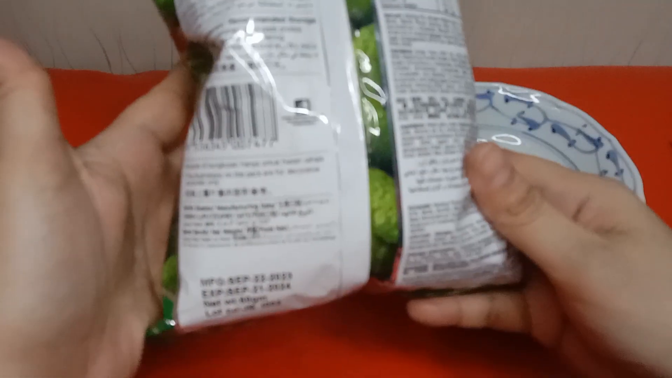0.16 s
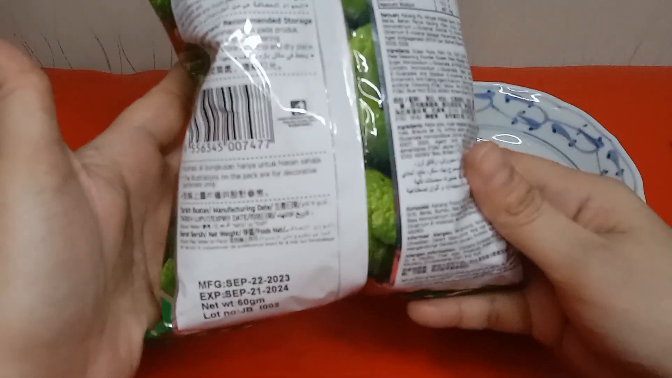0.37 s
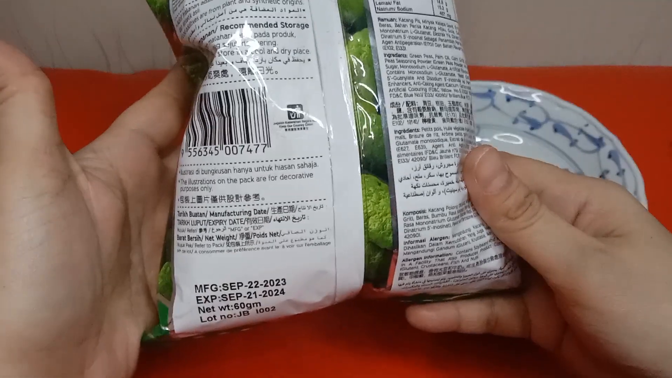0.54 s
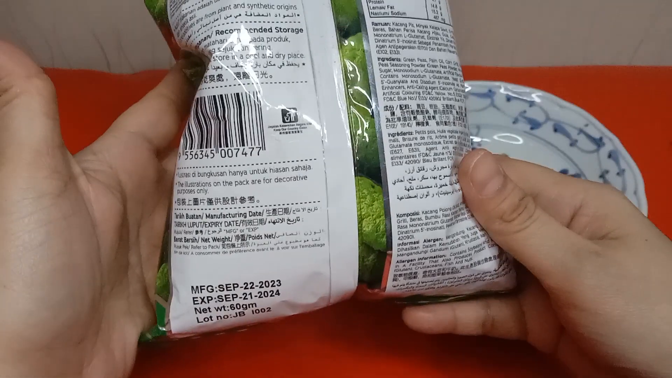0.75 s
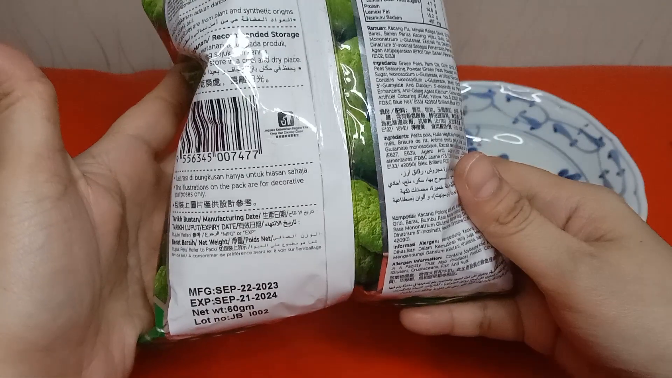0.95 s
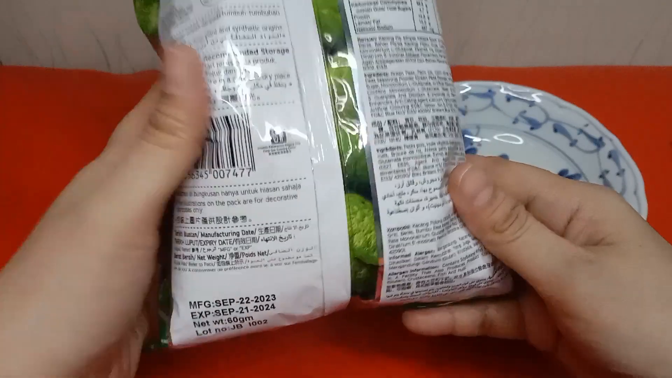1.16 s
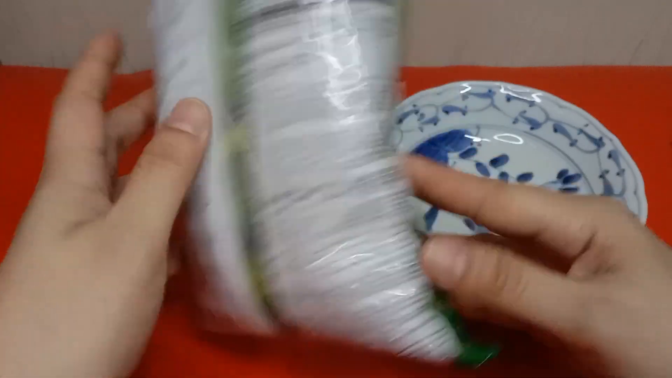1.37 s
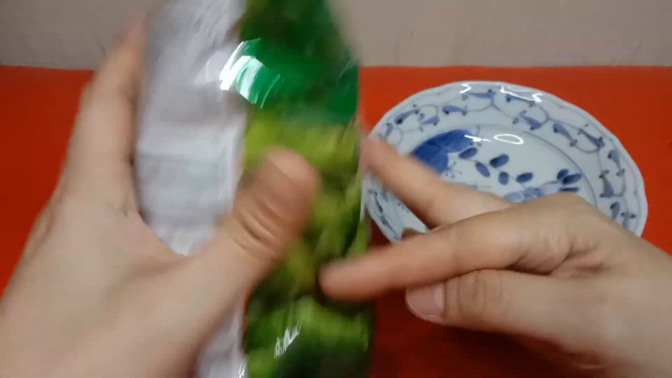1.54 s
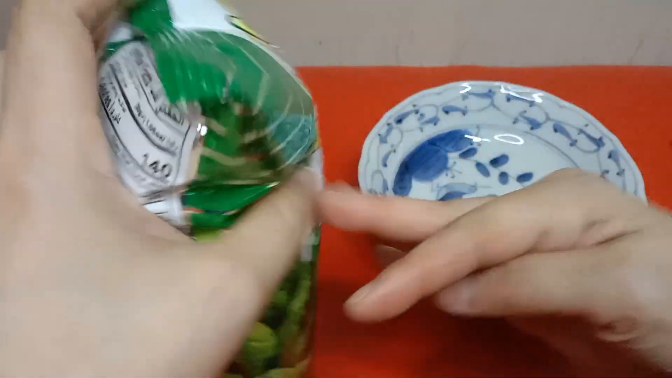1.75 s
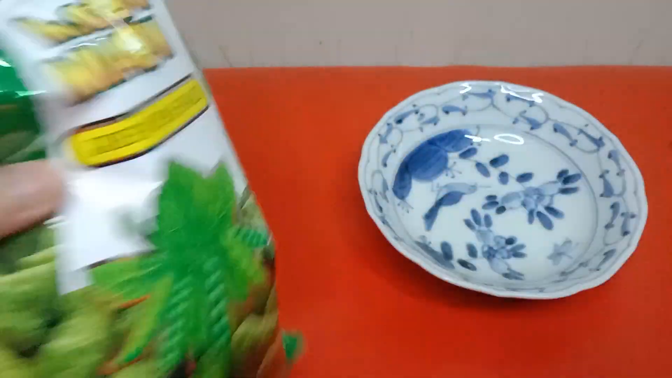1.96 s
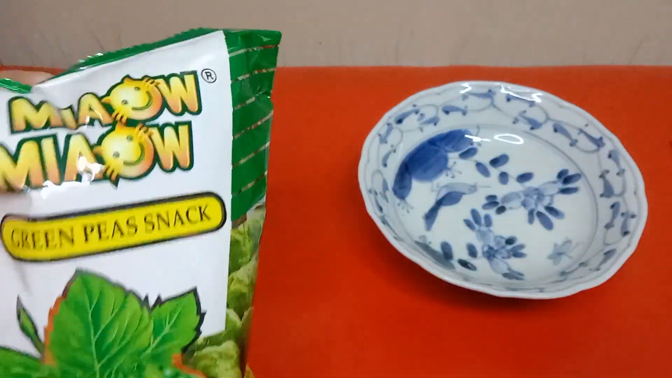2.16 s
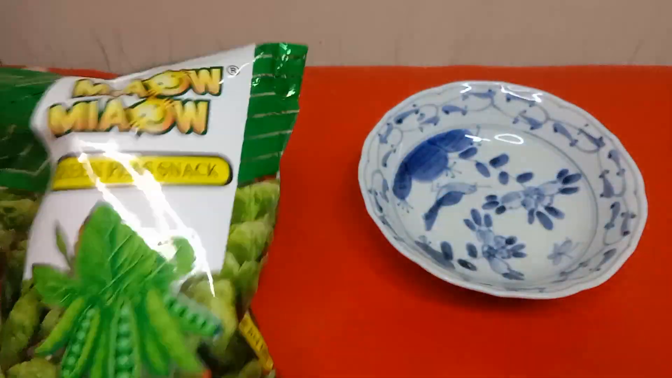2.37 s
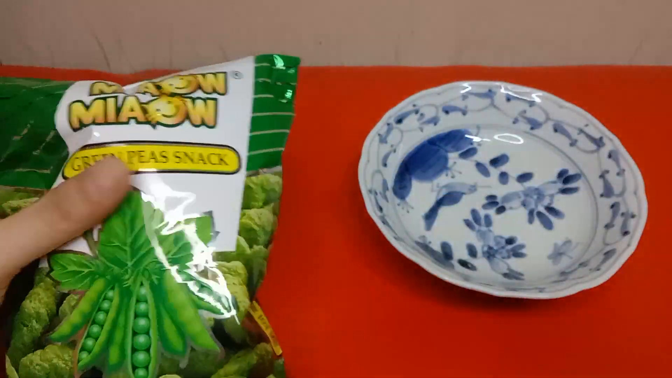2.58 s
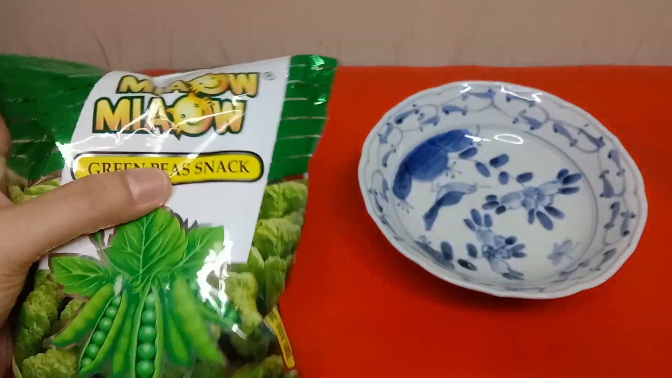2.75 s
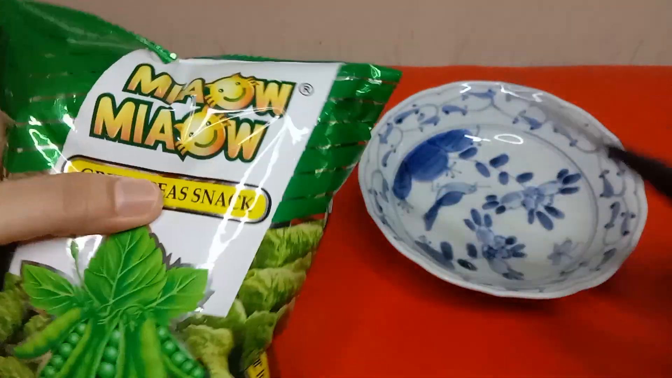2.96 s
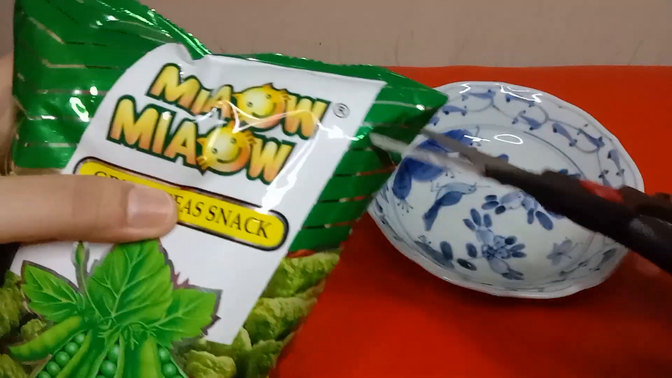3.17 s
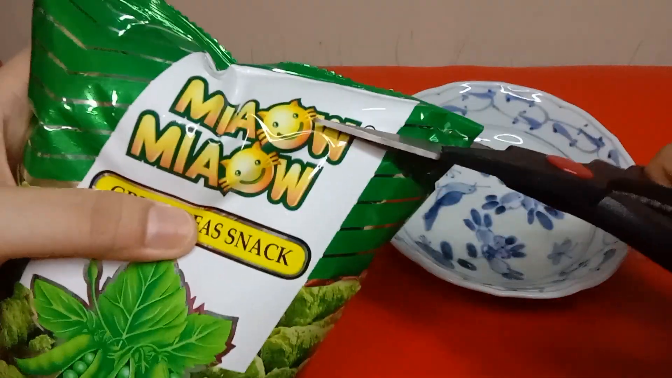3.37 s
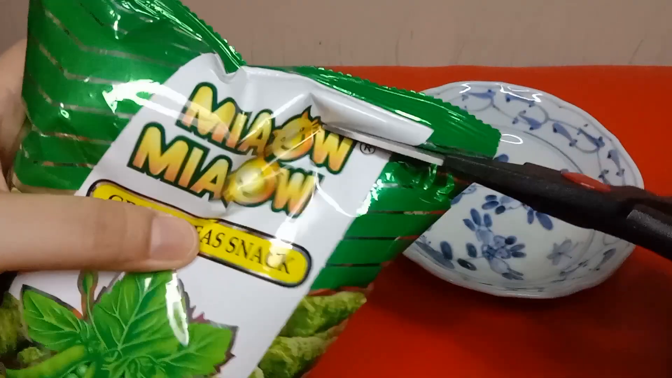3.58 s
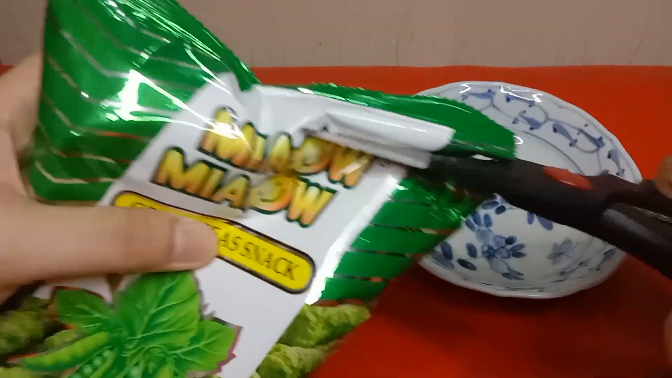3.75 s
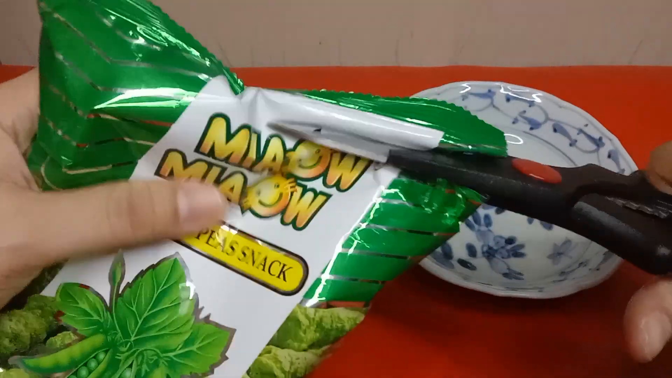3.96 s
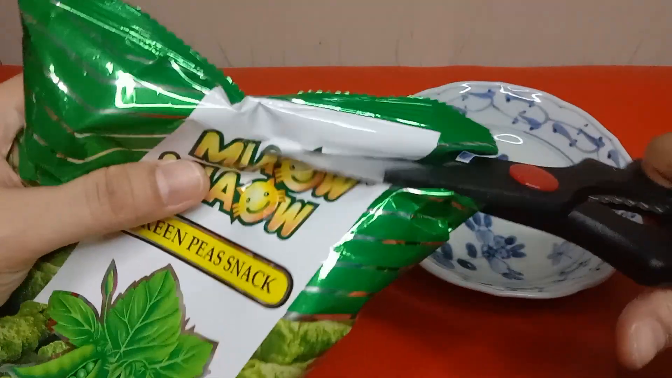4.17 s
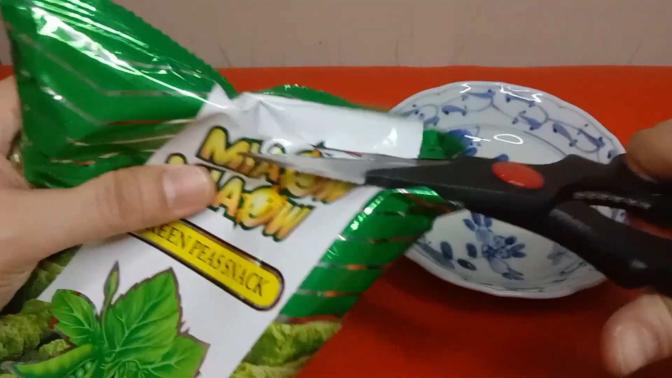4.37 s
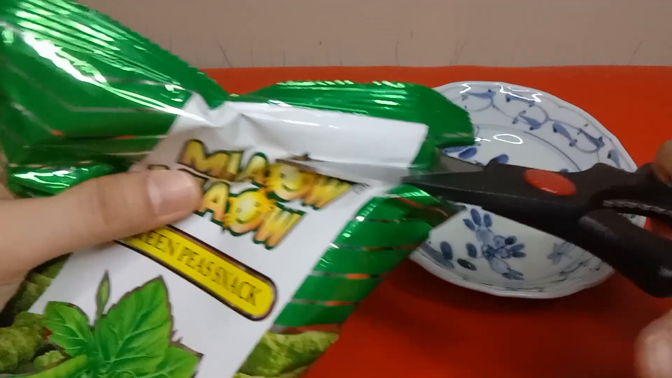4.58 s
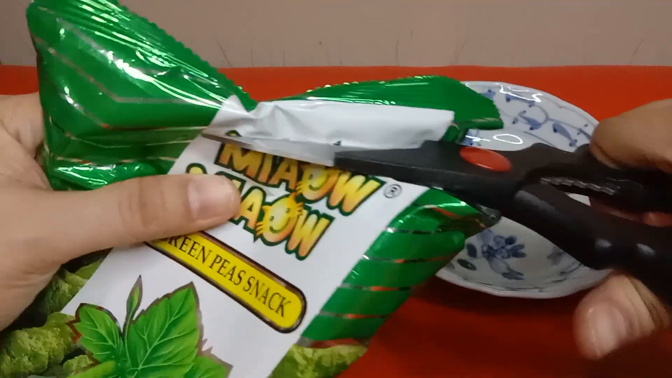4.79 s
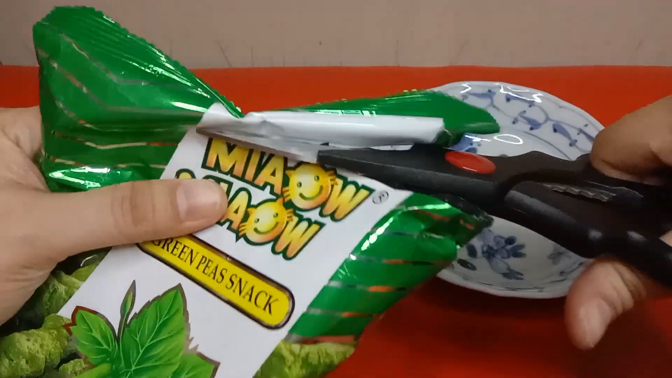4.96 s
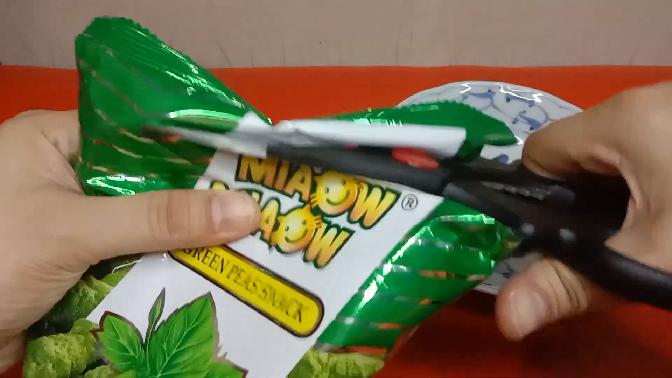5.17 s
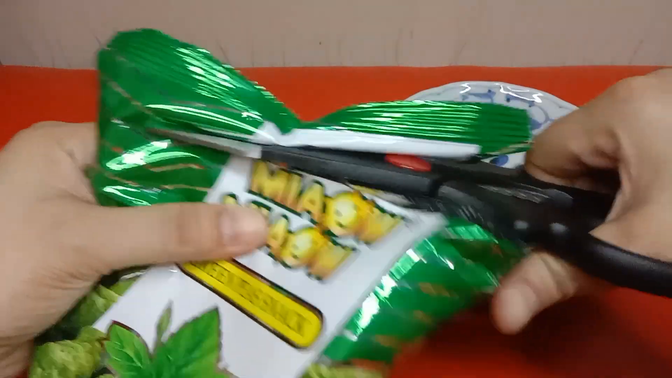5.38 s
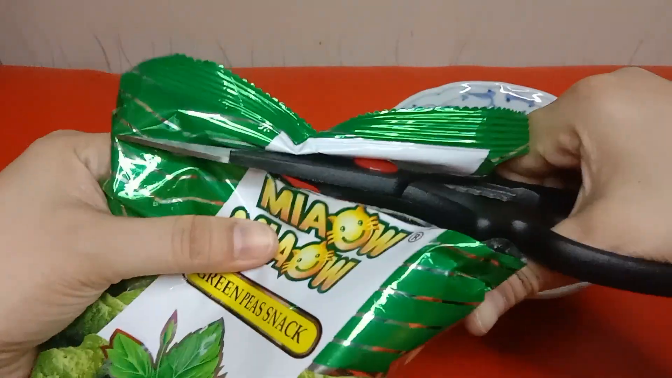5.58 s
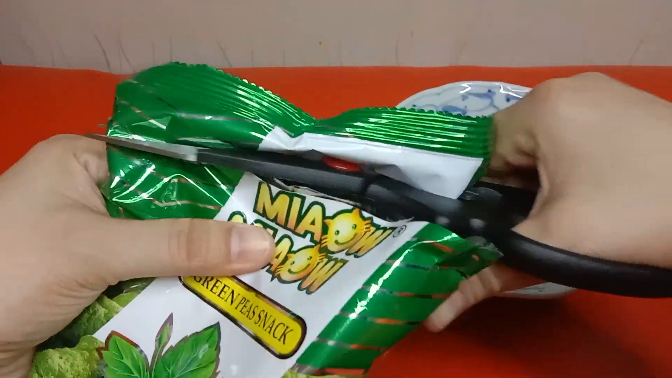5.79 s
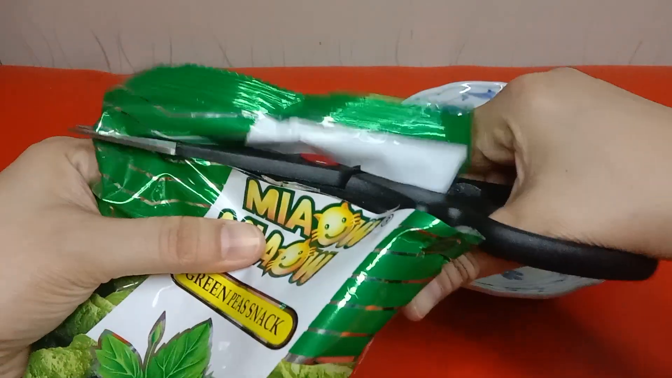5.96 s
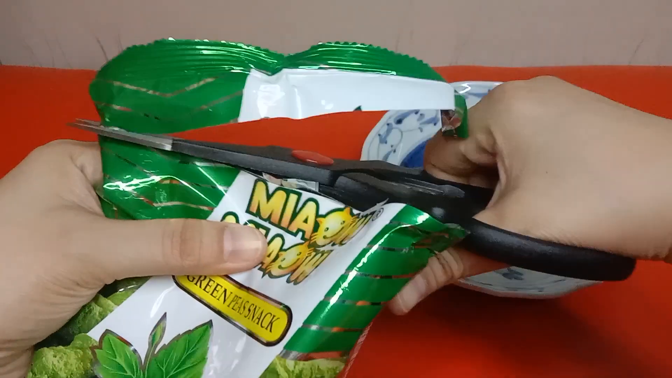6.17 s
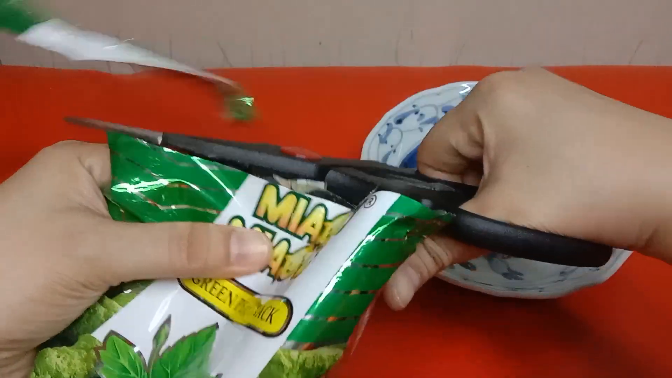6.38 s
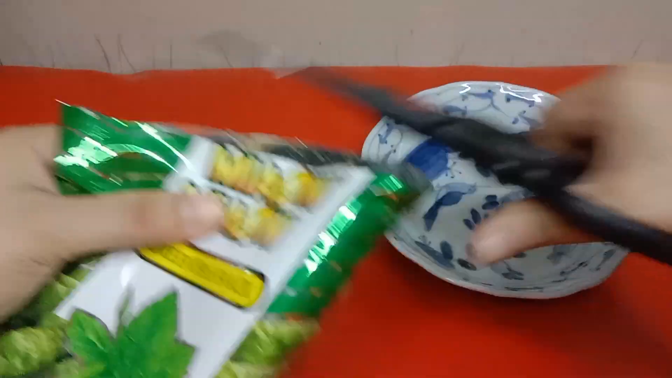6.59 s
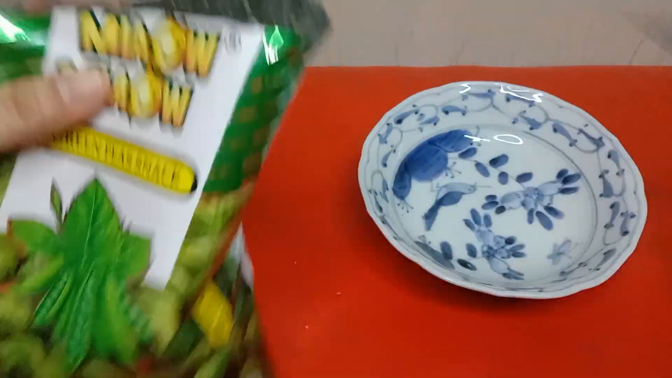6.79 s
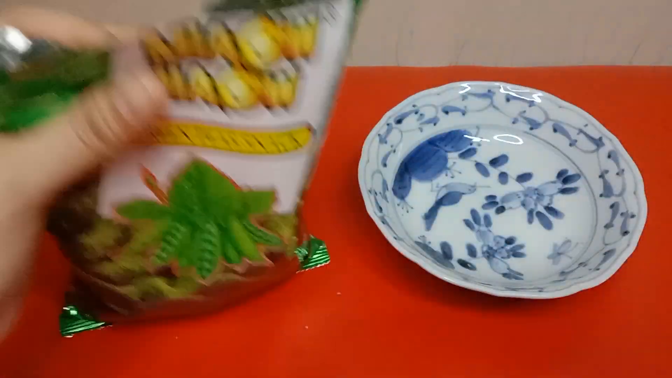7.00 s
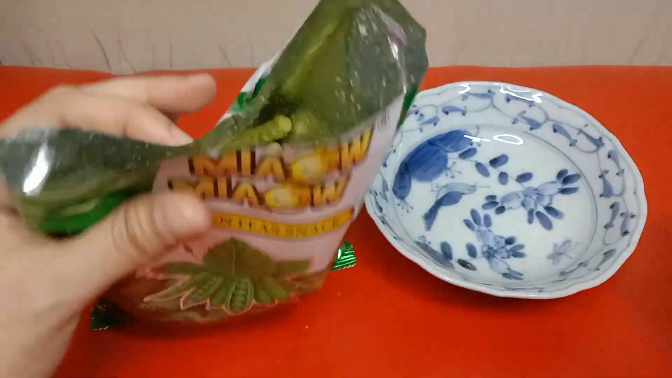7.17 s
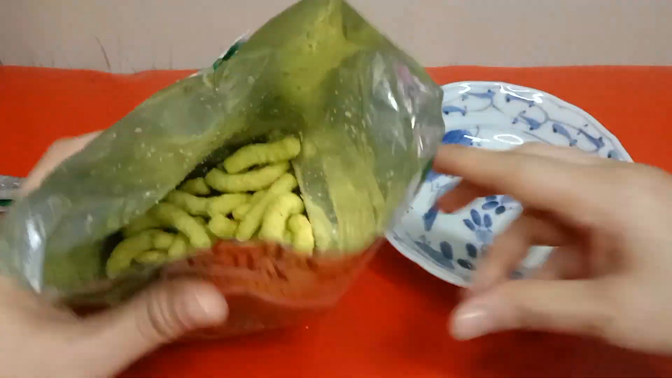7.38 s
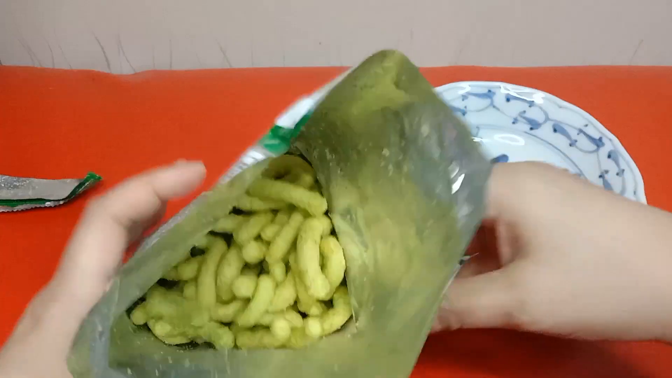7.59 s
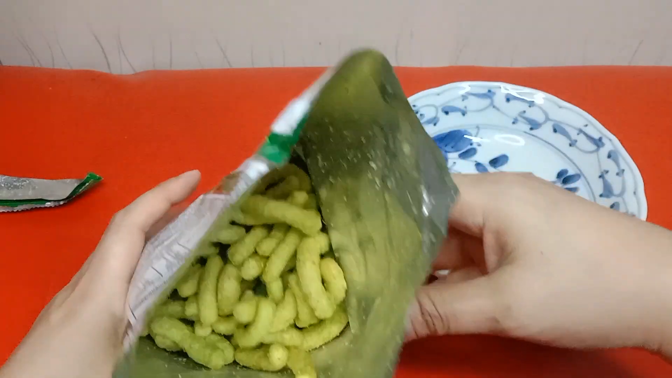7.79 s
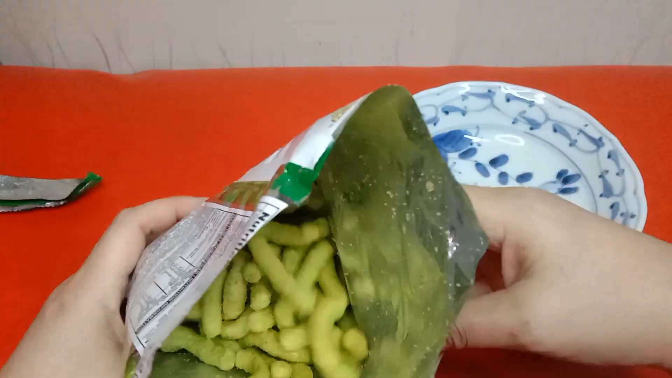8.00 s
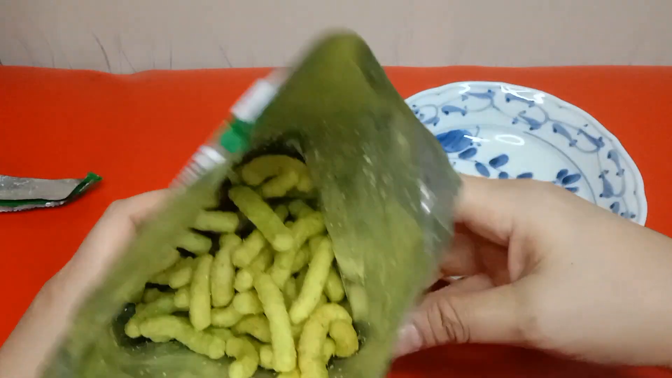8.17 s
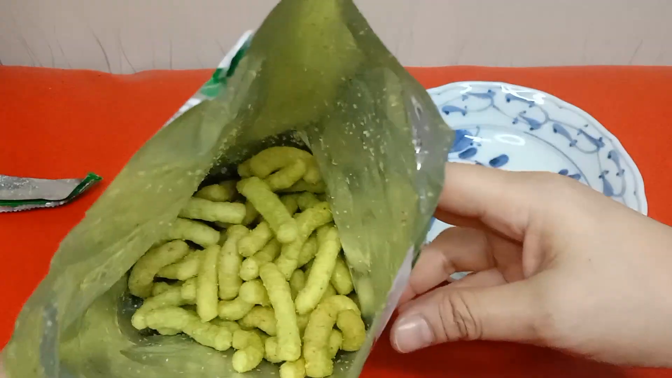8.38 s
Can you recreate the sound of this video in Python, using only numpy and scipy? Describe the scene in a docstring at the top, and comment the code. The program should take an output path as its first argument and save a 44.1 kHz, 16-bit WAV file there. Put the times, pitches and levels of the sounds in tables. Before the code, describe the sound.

After a near-quiet moment with a faint electrical hum, a foil bag crackles and light snacks knock around inside it. The crackling grows thick and snappy as scissors work through the top, then thins to a few softer crinkles as the bag is spread open. It is all very close to a phone microphone in a small room, with irregular low rumbles and thumps of air hitting the microphone.

```python
"""In a small room, a foil snack bag is turned, squeezed and cut open close to a phone microphone.
Creases buckle one by one, releasing elastic energy as snaps over a fine crackle. The snacks knock
together and excite the air in the bag, and the last cuts set the scissor blades in free vibration.
Turbulent air buffets the microphone port, a transformer hums faintly and the room reverberates.
The phone turns the bag down in strong puffs and gates faint treble."""
import sys
import numpy as np
from scipy import signal
from scipy.fft import rfft, irfft, next_fast_len
from scipy.io import wavfile
from scipy.ndimage import uniform_filter1d, map_coordinates

SR = 44100
rng = np.random.default_rng(int(sys.argv[2]) if len(sys.argv) > 2 else 0)


def unload_audio(sound):
    """Save the sound as a 16-bit wav file, at the path given as the first command line argument."""
    columns = np.transpose(np.atleast_2d(sound))
    # keep every value between -1 and 1, then stretch to whole-number steps
    steps = np.round(np.clip(columns, -1, 1) * 32767)
    wavfile.write(sys.argv[1], SR, steps.astype(np.int16))


N = 372204

# Harmonics of the transformer: harmonic number, rms level/dB
HUM_HARMONICS = [(1, -68.5), (2, -81), (3, -82), (7, -89.5), (9, -92.5), (11, -88.5), (13, -71.5),
                 (31, -96.5), (43, -100)]
# Spectrum of the quiet room air: f/Hz, relative level/dB
ROOM_AIR_SPECTRUM = [(30, -10), (100, 7.5), (400, -25), (1100, -17), (2200, -26.5), (5500, -28),
                     (12000, -46)]
# Puffs of air pushed at the port: start t/s, duration/s, level/dB
PUFFS = [(0.296, 0.031, -50.5), (0.609, 0.0038, -30.5), (1.046, 0.028, -50), (1.869, 0.14, -45.5),
         (2.032, 0.19, -31), (2.335, 0.0062, -22), (2.477, 0.07, -23), (2.596, 0.059, -30.5),
         (2.694, 0.058, -23.5), (2.769, 0.32, -29), (3.142, 0.04, -41.5), (3.233, 0.034, -29),
         (3.417, 0.054, -26.5), (3.557, 0.21, -25), (3.779, 0.046, -25), (3.862, 0.19, -29),
         (4.113, 0.1, -28.5), (4.343, 0.18, -38.5), (4.489, .1, -28), (4.78, 0.026, -36.5),
         (4.974, 0.037, -29.5), (5.05, 0.045, -46.5), (5.169, 0.14, -32.5), (5.579, 0.066, -36.5),
         (5.656, 0.3, -20.5), (5.863, 0.18, -37), (6.693, 0.026, -28), (6.74, 0.18, -30.5),
         (6.98, 0.13, -30), (7.436, 0.0091, -38), (7.483, 0.07, -30), (7.612, 0.16, -54.5),
         (8.076, 0.054, -42.5), (8.187, 0.014, -33.5)]
# Spectrum of turbulence at the port: f/Hz, relative level/dB
EDDY_SPECTRUM = [(25, -37), (62, 2), (118, 4.5), (184, -5), (257, -10.5), (299, -12), (430, -30),
                 (760, -53), (1540, -120)]
# Single puffs that thump the port: t/s, relative level/dB
THUMPS = [(0.604, -31.5), (2.468, -22), (2.78, -14), (2.864, -20.5), (3.446, -16.5), (3.533, -19.5),
          (3.777, -14.5), (3.947, -16), (5.667, -13.5), (5.715, -10.5), (5.893, -17), (6.766, -12.5),
          (7.033, -19), (7.057, -22.5), (7.481, -22.5)]
# Creases that buckle: t/s, relative snap level/dB, body level re snap/dB, panel f/Hz
SNAPS = [(0.6498, -51, 10, 2870), (0.7057, -50.5, 9, 2500), (1.2514, -33.5, -4, 1200.0),
         (1.2944, -16.5, -7.5, 1190), (1.352, -25, 3.5, 1170), (1.3937, -19, -1.5, 814),
         (1.406, -12, -10.5, 1050), (1.4368, -8.5, -6, 1200), (1.4792, -4.5, -19, 800),
         (1.5426, -22.5, 5.5, 1140), (1.6072, -6.5, -6, 1860), (1.6191, -2.5, -5, 1430.0),
         (1.6956, -12, -4.5, 886), (1.7452, -13.5, -4.5, 1220), (1.7726, -5, -26, 1330),
         (1.8031, -7, -10, 1340.0), (2.067, -22, -9, 837), (2.174, -34, 15, 1230),
         (2.2723, -20.5, -11.5, 1010), (2.479, -26, -5, 1220), (2.5998, -12.5, -4, 1160.0),
         (2.6305, -16.5, -9.5, 740), (2.7282, -1.5, -4.5, 1190), (2.7551, -12.5, -10.5, 1170.0),
         (2.809, -0.5, -16.5, 800.0), (2.9305, -34.5, 11, 1180), (3.006, -3, -7, 1370),
         (3.019, -17.5, -14.5, 1330), (3.178, -47.5, 13.5, 1400), (3.2474, -15, 6.5, 1380),
         (3.3549, -12.5, -19, 1600.0), (3.373, -18.5, -6, 780.0), (3.3836, -32, 11.5, 970),
         (3.4244, -8, -17, 1660), (3.474, -17.5, -9, 700), (3.5266, -3.5, -19.5, 516),
         (3.537, -19, 0.5, 846), (3.553, -4, -8.5, 1600), (3.5805, -4.5, -10.5, 1320),
         (3.617, -2, -5.5, 860), (3.648, -5.5, -4.5, 1410), (3.7342, -2, -19, 880.0),
         (3.8245, -5, -5, 1550), (3.8721, -7, -6, 1970), (3.9233, -16, -40, 1430),
         (3.9907, -3.5, -16.5, 1850.0), (4.0065, -6.5, -8.5, 1350), (4.0346, -2, -13, 1530),
         (4.0767, -11, -8.5, 2160), (4.1501, -10.5, -7.5, 1630), (4.218, -15, -20, 510),
         (4.2771, -16.5, -27, 1920), (4.341, -24, -2.5, 610), (4.366, -19.5, -3.5, 870),
         (4.4335, -8, -8, 1610), (4.4393, -12, -6.5, 1400), (4.459, -10.5, -14.5, 1220),
         (4.6846, -19.5, -11, 940), (4.7339, -16.5, -13, 760), (4.8996, -7.5, -22.5, 2500.0),
         (4.9156, -1.5, -19.5, 1680.0), (4.927, -3, -18.5, 1270), (4.945, -12, -8, 2120),
         (4.9622, -4.5, -7.5, 1540), (4.9899, -9, -3.5, 1740), (5.0129, -9, -7.5, 1620),
         (5.0247, -12.5, -29, 1370), (5.1131, -10, -8, 1180), (5.1447, -11, -16.5, 1200),
         (5.1706, -10, -14, 1100), (5.21, -8.5, -17, 1620), (5.288, -11.5, -11.5, 1850),
         (5.3163, -16, -10, 880.0), (5.467, -22, 2.5, 1480), (5.4777, -14, -26.5, 1460.0),
         (5.4889, -22, 3.5, 1290), (5.548, -17, -41, 2500.0), (5.563, -1.5, -38, 970),
         (5.6508, -6, -8, 2670), (5.7377, -2.5, -15.5, 930), (5.8102, -15, -7.5, 1030),
         (5.876, -10, -7.5, 1620), (5.9835, -14.5, -9, 1130), (5.9989, -10, -19, 960.0),
         (6.0369, -10.5, -34, 880), (6.048, -11.5, -11.5, 2720), (6.0498, -27.5, 8.5, 960),
         (6.1084, -17.5, -14.5, 2700), (6.3152, -22, -36, 2100), (6.3434, -13.5, -18, 2050.0),
         (6.4005, -32.5, 1.5, 1600), (6.4129, -13, -24, 1260), (6.5168, -29, 2.5, 1850),
         (6.5972, -12, -33, 1670), (6.614, -42.5, 14.5, 1510), (6.7499, -12, -12, 1320.0),
         (6.899, -25, -22, 1700), (6.94, -27, -2, 2640), (7.0035, -15, -13, 1650), (7.034, -17.5, -8, 490),
         (7.0574, -9, -13.5, 685), (7.1091, -21.5, -10.5, 1550), (7.196, -29, -5, 1000),
         (7.2845, -26.5, -27, 1580), (7.3359, -29.5, -9, 1380), (7.6908, -13.5, -8.5, 1430),
         (7.703, -23, -3, 1130), (7.826, -33, -13, 1200.0), (7.8975, -34.5, -1.5, 1190),
         (7.976, -28, -2, 964), (7.997, -19, -11, 1240), (8.0197, -12, -7.5, 1470),
         (8.0715, -18.5, -7.5, 1900), (8.4157, -23, -9, 2190.0)]
# Spectrum of the film heard through the microphone: f/Hz, relative level/dB
FILM_SPECTRUM = [(240, -40.5), (400, -5), (715, -7.5), (847, -4), (1130, -8), (1610, 1), (2060, -5),
                 (3300, -1), (4220, -7), (5650, 2.5), (8670, -8), (11400, -16), (15500, -17)]
# Spells of the hands working the bag: start t/s, duration/s, film level/dB, snack level/dB
GRIPS = [(0.654, 0.064, -80, -58.5), (1.238, 0.28, -44.5, -43), (1.391, 0.44, -41.5, -33),
         (1.853, 0.069, -44, -42.5), (2.089, 0.2, -50.5, -45.5), (2.438, 0.34, -56.5, -49),
         (2.711, 0.2, -44.5, -34.5), (3.152, 0.079, -55.5, -50), (3.364, 0.15, -48.5, -44.5),
         (3.582, 0.4, -39, -37), (4.149, 0.061, -34.5, -38.5), (4.305, 0.19, -41.5, -40),
         (4.566, 0.02, -47, -42), (4.669, 0.14, -37, -38.5), (4.88, 0.092, -46.5, -42),
         (5.103, 0.21, -37, -41), (5.431, 0.12, -38.5, -45.5), (5.8, 0.037, -36, -38),
         (5.988, 0.027, -34.5, -41), (6.114, 0.094, -46.5, -55.5), (6.328, 0.058, -40.5, -50),
         (6.521, 0.013, -43.5, -56), (6.898, .3, -52, -50), (7.341, 0.14, -58.5, -55.5),
         (7.497, 0.3, -62.5, -69), (7.673, 0.02, -59.5, -46), (7.949, 0.021, -44.5, -39),
         (7.983, 0.16, -47, -47)]
# Spectrum of snacks shifting in the air-filled bag: f/Hz, relative level/dB
SNACK_SPECTRUM = [(110, -31), (180, -4.5), (237, -5), (697, 1), (1260, 5), (2500, 1), (3250, -27)]
# Resonances of air pockets among the snacks: f/Hz, bandwidth/Hz, gain/dB
AIR_POCKETS = [(840, 49, 4.5), (1028, 72, -2), (1313, 80, 1)]
# Heaps of snacks landing as the sealed bag is turned: t/s, level/dB
TUMBLES = [(1.413, -24), (1.495, -31), (1.532, -25.5), (1.614, -26.5), (1.695, -21.5), (1.753, -27)]
# Modes of the scissor blades: f/Hz, level re snap/dB, t60/s
BLADE_MODES = [(1074, -40.5, 0.43), (3000, -40.5, .3)]
# Reverberation time of the room: f/Hz, t60/s
ROOM_DECAY = [(300, 0.13), (3000, 0.28), (15000, 0.21)]


def amp(db):
    """Amplitude ratio of a level in decibels."""
    return 10 ** (np.asarray(db) / 20)


def unit(x):
    """Normalisation to unit rms."""
    return x / np.sqrt(np.mean(x ** 2) + 1e-20)


def along(points, hz):
    """Interpolation of (f/Hz, value) points on a logarithmic frequency axis."""
    f, value = np.transpose(points)
    return np.interp(np.log(hz + 1), np.log(f + 1), value)


def wobble(rate):
    """Smooth random modulation: a spline through `rate` Gaussian knots a second."""
    return map_coordinates(rng.standard_normal(int(N * rate / SR) + 4), [np.arange(N) * rate / SR])


def coloured(x, points, lo_hz=0, hi_hz=30000, size=4096):
    """Minimum-phase filtering with unit energy: the given spectrum between two soft band edges."""
    hz = np.fft.rfftfreq(size, 1 / SR) + 1
    gain = amp(along(points, hz)) / np.sqrt((1 + (lo_hz / hz) ** 8) * (1 + (hz / hi_hz) ** 8))
    cepstrum = irfft(np.log(gain + 1e-6))
    cepstrum[1:size // 2] *= 2
    cepstrum[size // 2 + 1:] = 0
    kernel = irfft(np.exp(rfft(cepstrum)))
    return signal.oaconvolve(x, kernel / np.linalg.norm(kernel))[:N]


def bursts(times, gains, shapes, lead=0.0018):
    """Superposition of transients, one row of shapes each, starting `lead` seconds early."""
    at = np.round((times - lead) * SR).astype(int).clip(0)[:, None] + np.arange(shapes.shape[1])
    return np.bincount(at.ravel(), (gains[:, None] * shapes).ravel(), N + shapes.shape[1])[:N]


def spells(start, length, level_db, rise_db_s, fall_db_s):
    """Envelope of incoherent sources: each spell rises, holds and falls, and their powers add."""
    t = np.arange(0, N, 100) / SR
    early = np.maximum(start[:, None] - t, 0)
    late = np.maximum(t - (start + length)[:, None], 0)
    power = np.sum(amp(level_db[:, None] - rise_db_s * early - fall_db_s * late) ** 2, axis=0)
    return np.interp(np.arange(N) / SR, t, np.sqrt(power))


def pings(hz, cycles):
    """Damped oscillators: each swells quickly, then decays by 1/e every `cycles` periods."""
    turns = hz[:, None] * np.arange(int(.03 * SR)) / SR
    return np.sin(2 * np.pi * turns) * np.exp(-turns / cycles) * (1 - np.exp(-turns / 0.15))


def transformer(overtone_gain, hum_hz=119.7):
    """Periodic vibration gives a harmonic series; each partial drifts slightly in level."""
    phase = 2 * np.pi * hum_hz * np.arange(N) / SR
    partials = [amp(db + wobble(1.6)) * np.sqrt(2) * np.sin(k * phase + 2 * np.pi * rng.random())
                for k, db in HUM_HARMONICS]
    return partials[0] + overtone_gain * sum(partials[1:])


def room_air():
    """Stationary broadband noise forms the ambient floor."""
    return amp(-67) * unit(coloured(rng.standard_normal(N), ROOM_AIR_SPECTRUM))


def buffet():
    """Turbulent pressure fluctuations at the port, of fairly even strength within each puff."""
    eddies = coloured(amp(4 * wobble(40)) * rng.standard_normal(N), EDDY_SPECTRUM, size=16384)
    strength = np.sqrt(np.abs(uniform_filter1d(eddies ** 2, size=1500)) + 1e-9)
    push = spells(*np.transpose(PUFFS), rise_db_s=857, fall_db_s=638.5)
    return push * unit(eddies / strength ** 0.35)


def thumps():
    """Heavily damped impulse response: a quick push on the diaphragm and its rebound."""
    times, level_db = np.transpose(THUMPS)
    rebound = pings(hz=np.full(len(times), 170), cycles=0.57)
    return bursts(times, -amp(level_db + 10.5), rebound, lead=.002)


def rattle(count, t60, rise, spike, lead=0.0029):
    """Broadband transient, a short crack: noise swells for a millisecond or two, spikes and dies away."""
    t = np.arange(int(.03 * SR)) / SR - lead
    decay_speed = amp(3 * rng.standard_normal((count, 1)))
    envelope = np.where(t < 0, np.exp(t / rise), amp(-60 * t * decay_speed / t60))
    noise = rng.standard_normal((count, len(t))) * envelope
    noise[:, np.argmax(t >= 0)] += spike * np.sign(noise[:, 0])
    return noise


def snaps(bright_from_db=-28.5):
    """Buckling: each crease cracks the stiff film and excites small facets and a panel of the bag."""
    times, snap_db, body_db, panel_hz = np.transpose(SNAPS)
    scatter = rng.standard_normal((len(times), 4))
    # faint creases are too slow to excite the highest frequencies
    bright_share = 1 / (1 + amp(2 * (bright_from_db - snap_db) + 9 * scatter[:, 0]))
    crack = rattle(len(times), t60=0.0087, rise=0.0012, spike=3.8)
    bright = bursts(times, bright_share * amp(snap_db - 8.5), crack)
    dull = bursts(times, (1 - bright_share) * amp(snap_db - 3.0), crack)
    film = coloured(bright, FILM_SPECTRUM, lo_hz=2870)
    film += coloured(dull, FILM_SPECTRUM, lo_hz=2600, hi_hz=6200)
    body_rattle = rattle(len(times), t60=0.025, rise=0.00086, spike=0.76)
    body = coloured(bursts(times, amp(snap_db + body_db - 5.5), body_rattle), FILM_SPECTRUM, hi_hz=2700)
    panel = bursts(times, amp(snap_db + body_db), pings(panel_hz, cycles=4.08), lead=0.0004)
    first_hz, second_hz, third_hz = 5000 * amp(3.25 * scatter[:, 1:].T).clip(.5, 2)
    long_rings = pings(second_hz, cycles=34) + pings(third_hz, cycles=32)
    facet_rings = pings(first_hz, cycles=11) + amp(-14) * long_rings
    facets = bursts(times, amp(snap_db - 14), facet_rings, lead=0)
    return film + facets + body + panel


def patchy(x, depth_db):
    """Shifting radiation: as different parts of the bag sound, bands swell and fade for tens of ms."""
    spectrum = signal.stft(x, nperseg=256)[2]
    field = uniform_filter1d(rng.standard_normal(spectrum.shape), size=2, axis=0)
    field = uniform_filter1d(field, size=20, axis=1)
    return signal.istft(spectrum * amp(depth_db * unit(field)), nperseg=256)[1][:N]


def grains(count, spread_db, t60, slide):
    """Shot noise: random ticks, most of them faint, over the friction hiss of sliding surfaces."""
    draw = rng.random((count, 2))
    times = draw[:, 0] * N / SR
    clumping_db = 1.5 * wobble(30)[(times * SR).astype(int)]
    size_db = -spread_db * np.log(draw[:, 1] + 0.0032) + clumping_db
    ticks = bursts(times, amp(size_db), rattle(count, t60, rise=0.0021, spike=2.4))
    return patchy(unit(ticks) + slide * rng.standard_normal(N), depth_db=4.0)


def agitation(grip_db, settle_db, settle_fall_db_s):
    """Excitation envelope: the hands' work and the settling after each snap add in power."""
    start, length, _, _ = np.transpose(GRIPS)
    snap_times = np.transpose(SNAPS)[0]
    handling = spells(start, length, grip_db, rise_db_s=403.5, fall_db_s=279)
    settling = spells(snap_times, 0, settle_db, rise_db_s=4000, fall_db_s=settle_fall_db_s)
    return np.hypot(handling, settling)


def film_crackle():
    """Small-scale buckling: tiny folds tick under the hands and after each snap."""
    _, _, grip_db, _ = np.transpose(GRIPS)
    _, snap_db, body_db, _ = np.transpose(SNAPS)
    envelope = agitation(grip_db, settle_db=snap_db + body_db.clip(0) - 26.5, settle_fall_db_s=261.5)
    ticks = grains(count=3000, spread_db=4, t60=.01, slide=.33)
    return envelope * unit(coloured(ticks, FILM_SPECTRUM, lo_hz=2200))


def air_pockets(x):
    """Cavity resonance: the pockets of air ring briefly on top of the knocks."""
    size = next_fast_len(N + SR // 2)
    f = np.fft.rfftfreq(size, 1 / SR)
    rings = sum(amp(db) * 1j * f * width / (hz * hz - f * f + 1j * f * width)
                for hz, width, db in AIR_POCKETS)
    return irfft(rfft(x, size) * (1 + rings), size)[:N]


def snack_knocks(slit_s=4.6, slit_loss_db=8.5, crossover_hz=670):
    """Dull collisions of puffed snacks in enclosed air; their low body weakens once the bag is slit."""
    _, _, _, grip_db = np.transpose(GRIPS)
    _, snap_db, body_db, _ = np.transpose(SNAPS)
    envelope = agitation(grip_db, settle_db=snap_db + body_db - 20.5, settle_fall_db_s=259)
    knocks = grains(count=2000, spread_db=2.6, t60=.018, slide=.3)
    seal = amp(-slit_loss_db * (np.arange(N) / SR > slit_s))
    upper = coloured(knocks, SNACK_SPECTRUM, lo_hz=crossover_hz, hi_hz=2300)
    lower = 0.64 * seal * coloured(knocks, SNACK_SPECTRUM, hi_hz=crossover_hz)
    return envelope * unit(air_pockets(upper + lower))


def tumbles(cushion_hz=259):
    """Impact on an air spring: each landing heap booms in the air cushion of the bag."""
    times, level_db = np.transpose(TUMBLES)
    boom_hz = cushion_hz * amp(rng.standard_normal(len(times)))
    return bursts(times, amp(level_db), pings(boom_hz, cycles=2.96), lead=0.0016)


def scissors(from_s=5.3, until_s=6.2):
    """Free vibration: snaps during the last cuts strike the modes of the steel blades."""
    times, snap_db = np.transpose([row[:2] for row in SNAPS if from_s < row[0] < until_s])
    blows = np.bincount((times * SR).astype(int), amp(snap_db + 2.2 * rng.standard_normal(len(times))), N)
    t = np.arange(SR // 2) / SR
    ring = sum(amp(db - 60 * t / t60) * np.sin(2 * np.pi * hz * t) for hz, db, t60 in BLADE_MODES)
    return signal.fftconvolve(blows, ring)[:N]


def reverberation(x, slices=20, delay_samples=150):
    """Diffuse decay; the bag moves, so every slice of time has its own pattern of echoes."""
    out, step = np.zeros(N + 2 * SR), N // slices + 1
    for k in range(slices):
        hz, t, noise = signal.stft(rng.standard_normal(SR // 4), SR, nperseg=256)
        decay = amp(-60 * t / along(ROOM_DECAY, hz)[:, None])
        tail = signal.istft(noise * decay, SR, nperseg=256)[1]
        wet = signal.fftconvolve(x[k * step:(k + 1) * step], tail / np.linalg.norm(tail))
        out[k * step + delay_samples:][:len(wet)] += wet
    return out[:N]


def level_follower(sound, change_db, threshold_db, window):
    """Level-dependent gain: it moves from 0 dB towards change_db as recent power passes the threshold."""
    power = np.abs(uniform_filter1d(sound ** 2, size=window, origin=window // 2 - 1))
    return amp(change_db * power / (power + amp(threshold_db) ** 2))


def treble_gate(x, threshold_db=-23.5, from_hz=1550):
    """Spectral gating: a treble band closes as it sinks far below its level of the last half second."""
    hz, _, spectrum = signal.stft(x, SR, nperseg=512)
    power = uniform_filter1d(np.abs(spectrum) ** 2, size=3, axis=-2)
    now = np.abs(uniform_filter1d(power, size=4)) + 1e-20
    lately = np.abs(uniform_filter1d(power, size=81, origin=40))
    floor = amp(2 * threshold_db) * lately / (1 + (from_hz / (hz[:, None] + 1)) ** 8)
    return signal.istft(spectrum * now / (now + floor), SR, nperseg=512)[1][..., :N]


def scene():
    """Superposition at one microphone; a wind guard lowers the bag and its echoes in strong puffs."""
    bag = snaps() + film_crackle() + snack_knocks() + tumbles() + scissors()
    wind = buffet() + thumps()
    wind_guard = level_follower(wind, change_db=-8.5, threshold_db=-16.5, window=SR // 40)
    # the overtones of the hum rise slightly while the bag has lately been loud
    overtone_gain = level_follower(bag, change_db=1, threshold_db=-54, window=SR // 2)
    bag_in_room = bag + amp(-11) * reverberation(bag)
    return (wind_guard * bag_in_room + wind + transformer(overtone_gain) + room_air())[None]


def record(dry, bass_cut_hz=35, top_hz=15700):
    """Transduction: treble gating, soft saturation, bass loss at the port and an upper band limit."""
    gated = treble_gate(dry)
    rounded = gated / (1 + np.abs(gated / .9) ** 4) ** (1 / 4)
    size = next_fast_len(N + SR // 2)
    hz = np.fft.rfftfreq(size, 1 / SR)
    passband = (hz < top_hz) * hz ** 2 / (hz ** 2 + bass_cut_hz ** 2)
    return irfft(rfft(rounded, size) * passband, size)[..., :N]


dry = scene()
out = record(dry)
unload_audio(out)
```